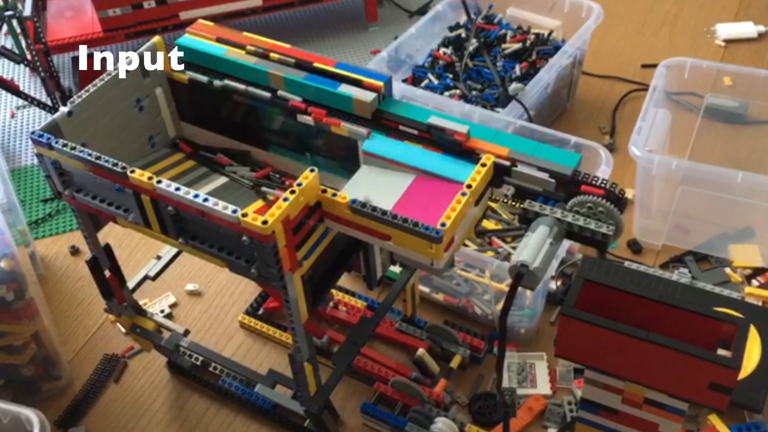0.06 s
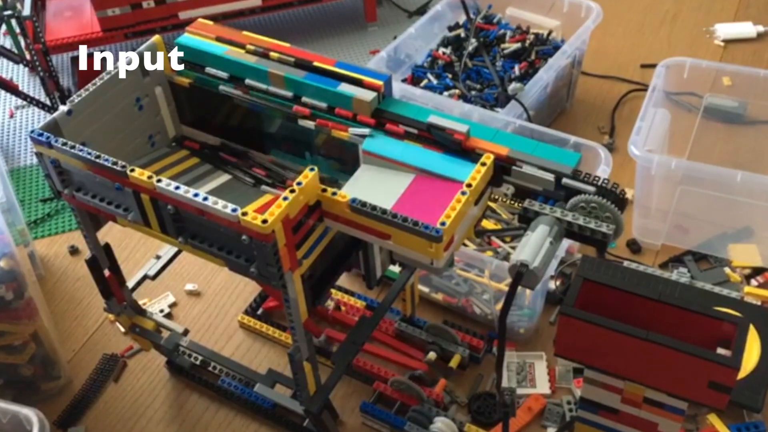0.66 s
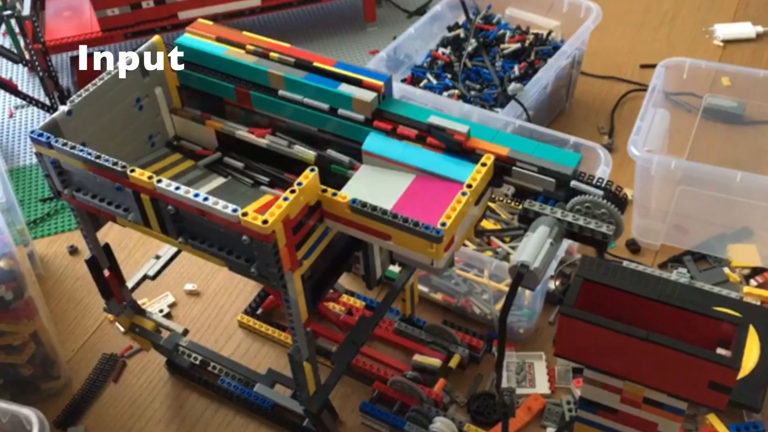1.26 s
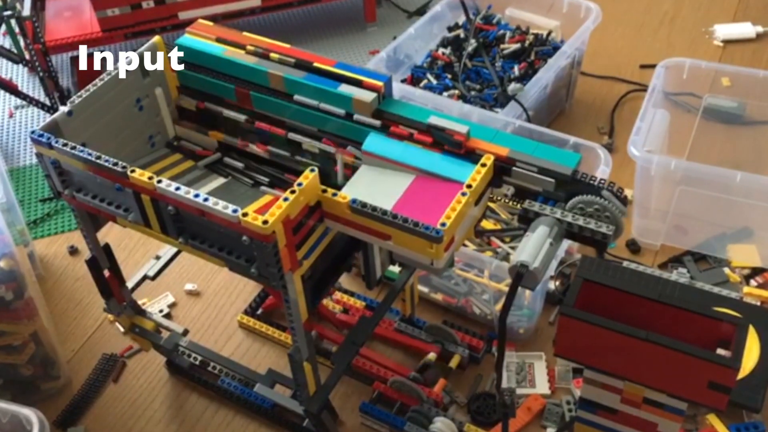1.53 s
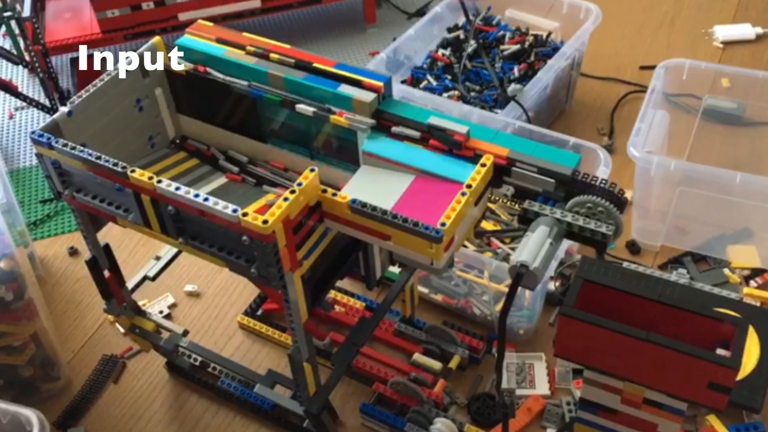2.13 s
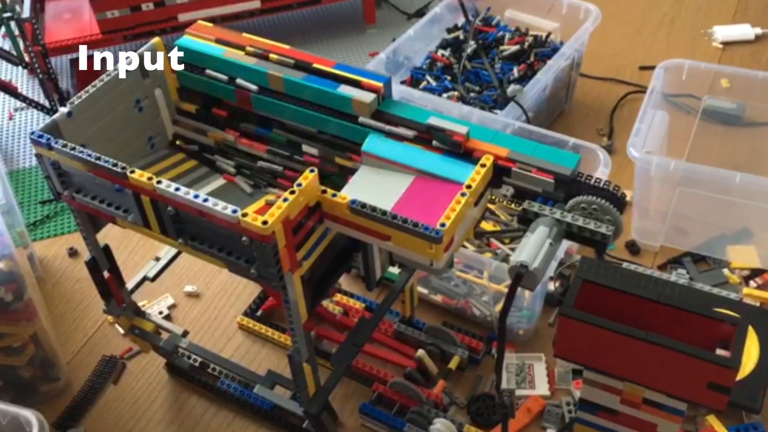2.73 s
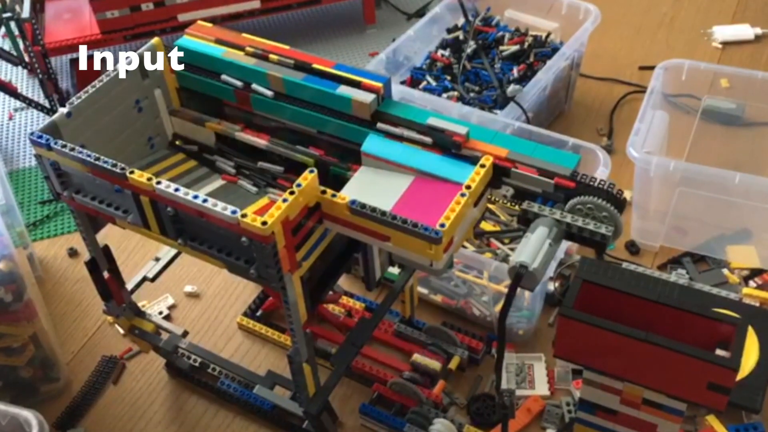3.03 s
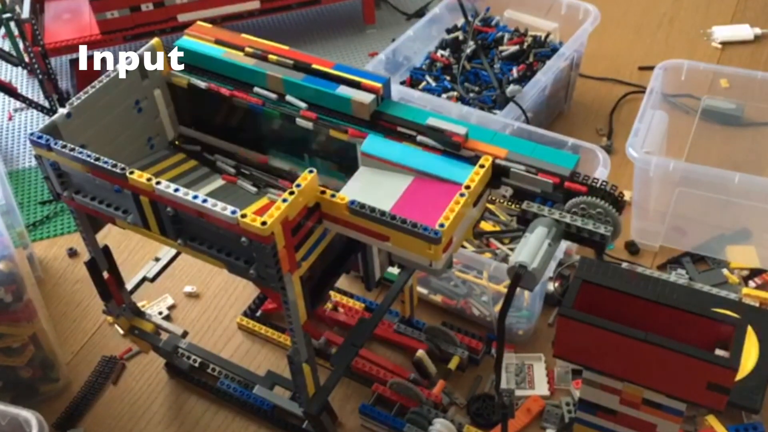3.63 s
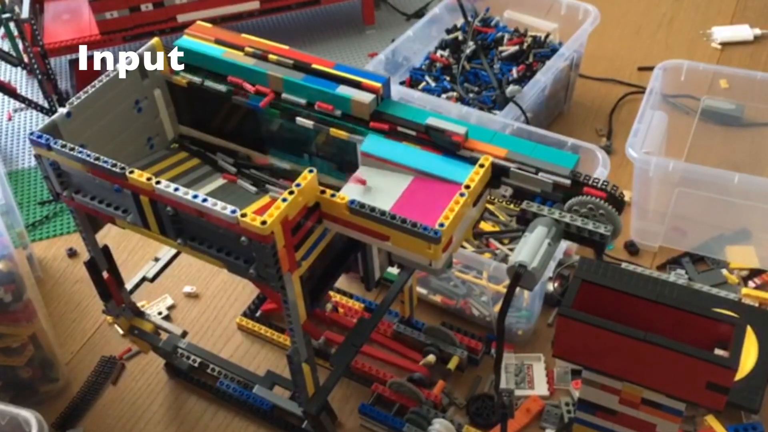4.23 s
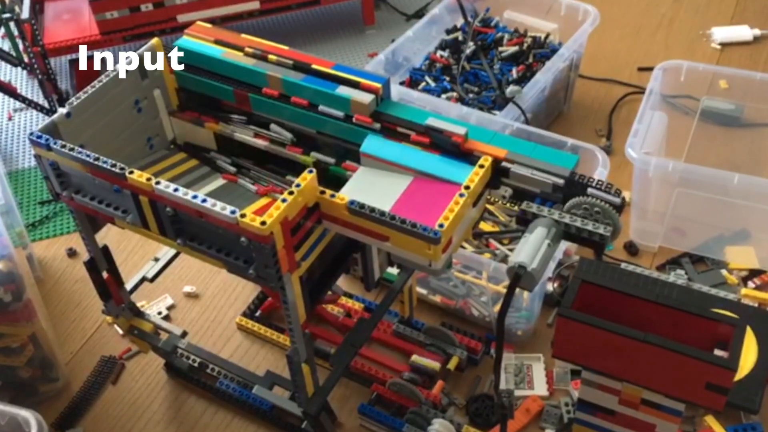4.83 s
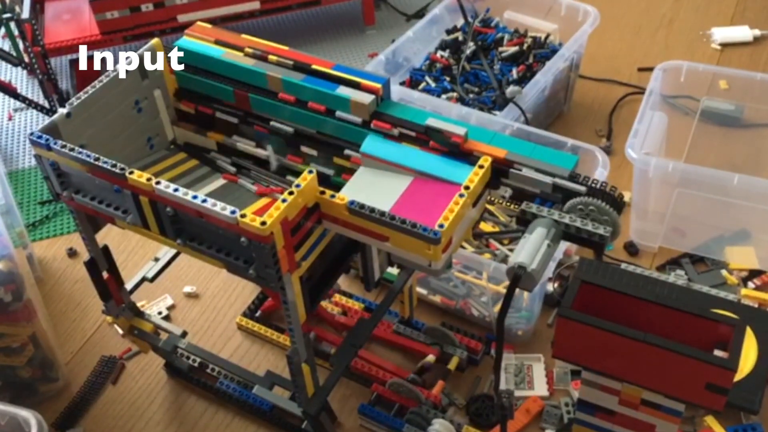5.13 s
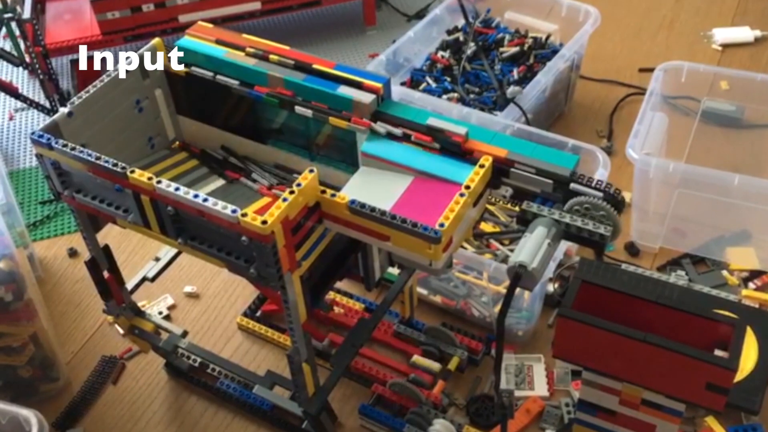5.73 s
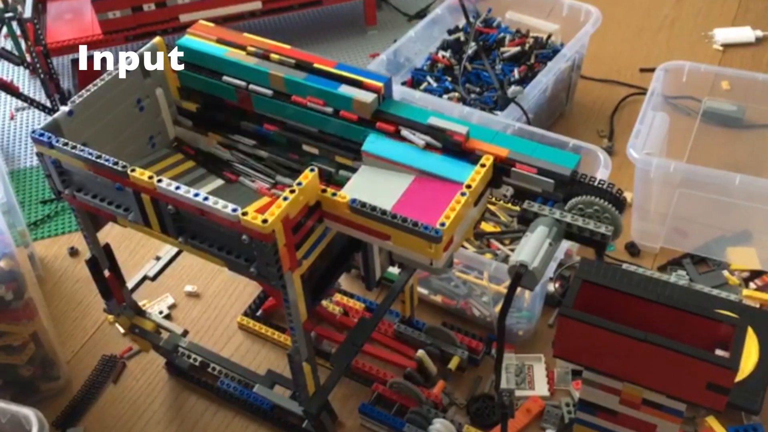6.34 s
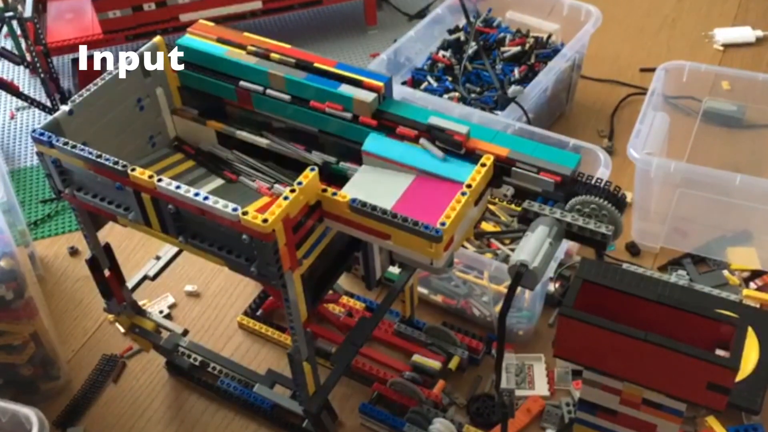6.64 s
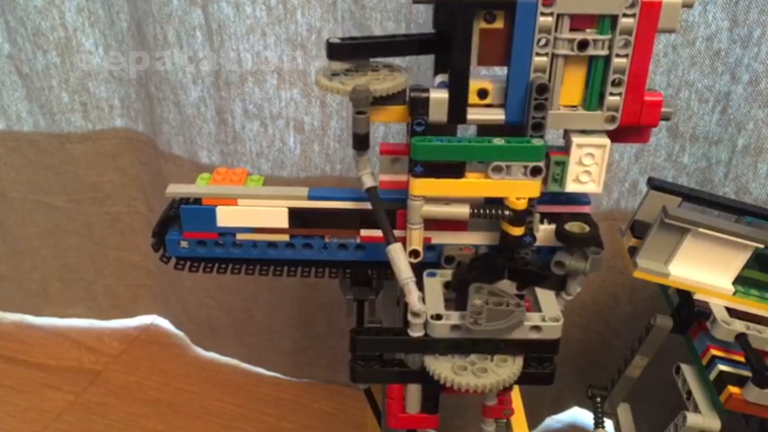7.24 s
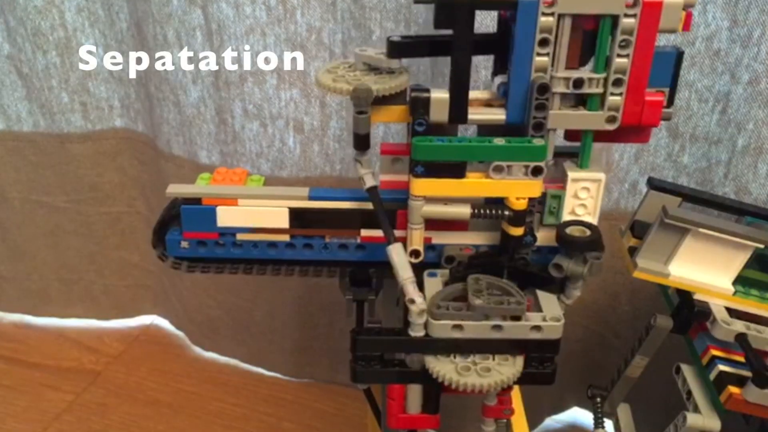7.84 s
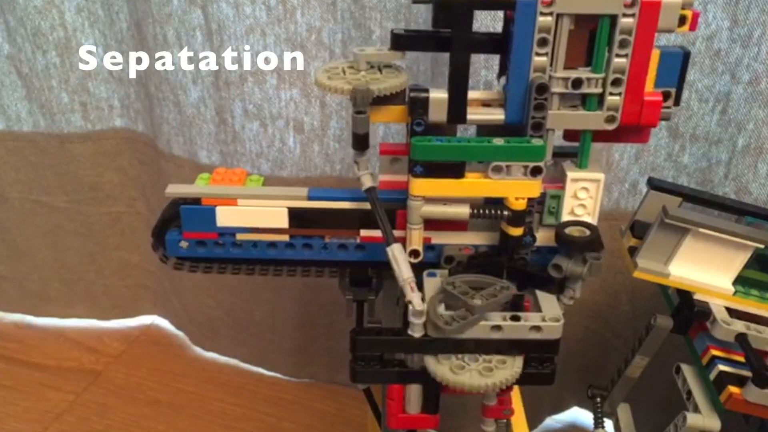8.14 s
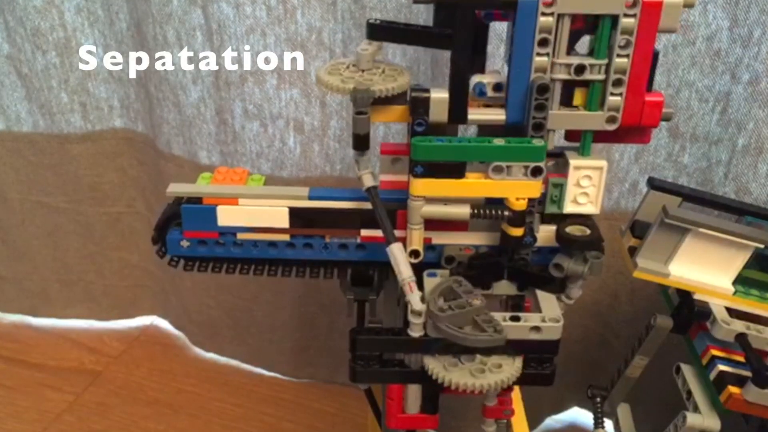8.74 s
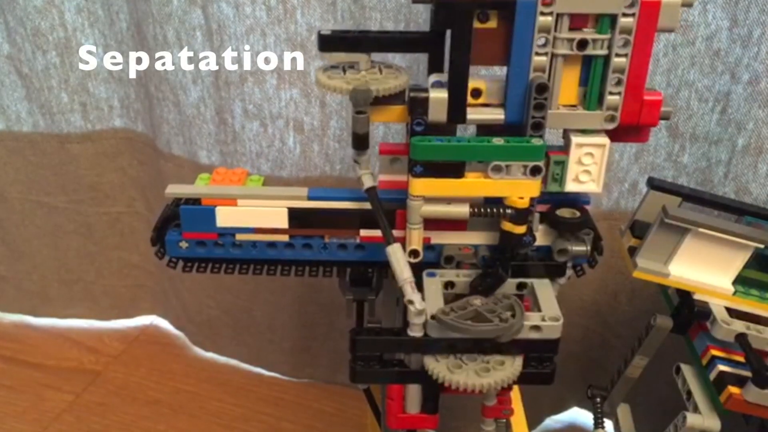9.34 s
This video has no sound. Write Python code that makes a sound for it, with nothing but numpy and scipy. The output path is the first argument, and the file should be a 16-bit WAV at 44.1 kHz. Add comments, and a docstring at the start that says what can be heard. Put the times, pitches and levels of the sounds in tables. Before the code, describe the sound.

Heard close up in a small room, loose plastic pieces rattle, click and tumble in repeated surges as a feeder lifts them. Its steps crack against a hollow frame now and then, over a faint fizz of gears. The sound then switches suddenly to the soft whir and whine of a small motor, which slows under load and speeds up again.

```python
"""Plastic brick sorting machine, close up

One microphone, close to the machine in a small room. A geared step feeder stirs a heap of loose parts:
they rattle, click and tumble, and the steps knock on the hollow frame. Then an abrupt cut to a quieter
stage, where a small geared motor whines and sags under the load of its crank."""
import sys
import numpy as np
from scipy import signal
from scipy.fft import rfft, irfft
from scipy.io import wavfile

SR = 44100
rng = np.random.default_rng(int(sys.argv[2]) if len(sys.argv) > 2 else 0)


def store_wav(level_fs):
    """Save 16-bit WAV to argv[1]."""
    pcm = np.round(np.clip(np.atleast_2d(level_fs), -1, 1) * 32767)
    wavfile.write(sys.argv[1], SR, pcm.T.astype(np.int16))


N = 422473
TIME = np.arange(N) / SR
CUT_S = 7.207  # from the feeder to the motor stage

# Levels in the tables are relative; each source adds its own gain.
# Decay of the small room: band_hz, t60_s
ROOM_DECAY = [(200, 0.32), (1300, 0.2), (3500, 0.26), (9000, 0.16), (16000, 0.11)]
# Hum of the table under the machine: frequency_hz, density_db
HUM_SPECTRUM = [(25, -14), (50, -31), (72, 8), (90, -8.5), (120, -12.5), (210, -4), (260, -9.5), (330, -4),
                (420, -9), (520, -5), (620, -24), (900, -28)]
# Fizz of the feeder's gear teeth: frequency_hz, density_db
GEAR_SPECTRUM = [(290, -43), (500, -4.5), (586, -17), (831, -6.5), (1550, -7), (1720, -42), (1980, -1),
                 (3110, 2.5), (3540, -40), (3980, -1), (6510, -3), (8330, 6), (10500, -1), (14700, 0.5),
                 (16000, -20)]
# Narrow modes of the motor housing: pitch_hz, level_db, t60_s
HOUSING_MODES = [(1813, 2.5, 0.0056), (2577, 2.5, 0.022), (3060, -4, 0.015), (3780, -1.5, 0.014),
                 (4360, -2, .018), (5310, -3, 0.016)]
# Brief squeaks in the feeder, then flares of the motor's whine: start_s, length_s, pitch_hz, level_db
SQUEAKS_AND_FLARES = [(4.258, 0.02, 4420, -36), (4.293, 0.029, 4300, -45), (5.848, .033, 4430, -45),
                      (6.045, .025, 4360, -40), (6.634, 0.075, 4430, -48.5), (6.927, .042, 4400, -39.5),
                      (7.305, 0.089, 1845, -53), (8.72, 0.11, 2090, -56.5), (8.73, 0.086, 1400, -59.5)]
# The motor sagging under its crank: time_s, mesh_hz, whine_db
MOTOR_RUN = [(7.21, 935, -54), (7.35, 910, -50.5), (7.52, 925, -54.5), (7.65, 960, -53), (7.72, 905, -52.5),
             (7.8, 768, -51.5), (7.99, 634, -54.5), (8.08, 627, -60), (8.22, 650, -57), (8.5, 603, -56.5),
             (8.65, 528, -59), (8.69, 650, -61), (8.77, 695, -59), (8.88, 675, -61), (9.02, 820, -52.5),
             (9.14, 878, -53), (9.26, 895, -49.5), (9.58, 936, -55.5)]
# Harmonics of the motor's gear mesh: multiple, level_db
MESH_HARMONICS = [(1, -8), (2, -2), (3, -3), (4, -7), (5, -3.5), (6, -9), (7, -7), (8, -22)]
# Resonances of the motor housing: frequency_hz, gain_db
HOUSING_SPECTRUM = [(250, -9), (620, -13), (900, -3), (1200, -9), (1420, 3), (1600, -0.5), (1820, 2.5),
                    (2060, -10), (2280, -2), (2560, 8), (2900, -9), (3170, 2.5), (3450, -1), (3780, -2),
                    (4150, -13), (4500, -5), (4900, -15), (8000, -17)]
# Whir of the motor's brushes: frequency_hz, density_db
WHIR_SPECTRUM = [(25, -5.5), (70, -8.5), (170, -15), (270, -11), (400, -14), (660, -16.5), (900, -13.5),
                 (1200, -14.5), (1800, -8), (2600, -3.5), (4300, -10), (6000, -7), (7500, -10.5),
                 (9200, -2.5), (10900, -0.5), (12000, -8.5)]
# The crank's linkage scraping: start_s, length_s, level_db
CRANK_SCRAPES = [(8.617, 0.03, -47), (8.845, .03, -48.5), (8.876, .035, -48)]
# Feeder strokes, about one a second: start_s, length_s, end_rattle_db, swell_db, end_tumble_db
FEEDER_STROKES = [(0.0, .22, -35, -4, -49.5), (0.576, 0.61, -39, -4, -50), (1.371, 0.53, -33.5, 11, -49),
                  (2.282, 0.43, -34, 7, -47), (3.175, 0.62, -33.5, 12.5, -51), (4.08, .41, -35.5, 6.5, -48),
                  (4.956, 0.51, -32.5, 15.5, -47.5), (5.892, 0.4, -33.5, 4.5, -45.5),
                  (6.776, 0.53, -38, 3.5, -47.5)]
# Bright rattle of light parts: frequency_hz, density_db
RATTLE_SPECTRUM = [(250, -50.5), (500, -15), (810, -13.5), (1100, -11.5), (1650, -6), (2200, -4),
                   (2900, -3.5), (3500, -5), (4900, -3.5), (6400, -7), (8100, -2), (10000, -8), (12300, -1),
                   (15500, -10)]
# Dull tumbling of heavy parts: frequency_hz, density_db
TUMBLE_SPECTRUM = [(30, -41), (80, -6), (140, -12), (190, -2.5), (240, -6), (300, -2.5), (420, -5.5),
                   (600, -10.5), (880, -1), (1100, -4), (1500, 2.5), (2300, -5), (3500, -11.5)]
# Clumps toppling into the hopper: start_s, length_s, level_db, low_cut_hz
CLUMP_TOPPLES = [(0.083, 0.047, -41.5, 900), (0.719, 0.041, -43, 1200), (0.768, 0.023, -42, 900),
                 (1.376, 0.036, -45.5, 400), (1.741, 0.042, -30.5, 150), (2.406, .06, -43.5, 395),
                 (3.182, .03, -46, 500), (3.475, 0.051, -35.5, 330), (3.568, 0.089, -41.5, 300),
                 (5.272, 0.056, -39, 400), (5.326, 0.04, -38, 250), (5.372, 0.081, -40.5, 180),
                 (6.073, 0.043, -40, 100), (7.075, 0.063, -40, 250), (7.124, 0.098, -42.5, 70)]
# Parts skidding along a step: start_s, length_s, level_db
PART_SLIDES = [(1.835, .06, -35), (1.915, 0.065, -35), (2.27, 0.041, -35), (2.903, 0.079, -41),
               (4.663, .1, -34), (5.893, 0.054, -29.5), (6.53, 0.051, -38), (7.021, 0.054, -38)]
# The loudest single parts landing: start_s, level_db, pitch_hz, frame_share_db
PART_CLICKS = [(0.0265, -10, 4260, -23), (0.11, -11.5, 2900, -14), (0.2436, -11, 3470, -15),
               (0.4752, -14, 2340, -16), (0.5147, -1, 4220, -24), (0.565, -7, 4100, -29),
               (0.613, -11.5, 4180, -24), (0.766, -22, 1470, 7), (0.841, -7.5, 8610, -20),
               (0.87, -9, 4160, -13), (0.9325, -9, 7700, -9.5), (0.9785, -8.5, 7560, -10),
               (1.2526, -10, 5100, -9), (1.5202, -16, 3160, -5.5), (1.5765, -14.5, 4600, -6),
               (1.734, -15.5, 1640, 6), (1.7509, -10, 1820, -0.5), (1.776, -12, 1570, -10),
               (2.2848, -17, 7550, -2), (2.514, -6, 12100, -10.5), (2.5712, -17, 1610, 3.5),
               (2.6344, -13.5, 7850, -5), (2.9206, -9.5, 11500, -24), (3.2578, -16, 8380, -19),
               (3.595, -13, 10300, -8), (3.7805, -9, 1680, -5), (3.8403, -9, 4190, -22),
               (4.2524, -15.5, 1590, -1), (4.3772, -11, 1750, 0.5), (5.149, -7.5, 4900, -10.5),
               (5.374, -9, 2950, -7), (5.4126, -10, 10400, -10), (5.8965, -24, 11500, -20),
               (6.0856, -10, 1670, -19), (6.1833, -11, 2730, -5), (6.733, -17.5, 3170, -19),
               (6.754, -13, 4400, -21), (6.793, -19, 4300, -20), (6.8339, -17, 3260, -18),
               (6.9053, -10.5, 11400, -18), (7.1328, -17.5, 1470, -3)]
# Modes of the hollow frame: pitch_hz, level_db, t60_s
FRAME_MODES = [(832, -12.5, 0.024), (1648, 3, 0.018), (1747, -26, 0.027), (1870, -10.5, 0.092),
               (2094, -9, 0.03), (2790, -10, 0.035), (3770, -12.5, 0.12), (4410, -3, 0.0033),
               (4830, -15, 0.017), (5175, -9.5, 0.011), (7600, -6, 0.0036), (8010, -11.5, 0.1),
               (11850, -18, 0.021)]
# Crack of a step against the frame: frequency_hz, density_db
CRACK_SPECTRUM = [(250, -59), (500, -54), (800, -8), (1150, -47), (1700, -10), (2700, 2), (3400, -4.5),
                  (4800, 10.5), (5700, 11), (6600, -2.5), (7800, 10.5), (9500, 1), (12300, 6), (15500, 2)]
# Steps snapping against the frame: start_s, level_db, frame_ring_db, second_contact_delay_s, jolt_db
STEP_KNOCKS = [(0.3925, -7, 2, 0.0029, -58), (1.1785, -6.5, 7, .005, -36), (1.667, -2.5, 2.5, 0.0093, -35),
               (3.7032, -7, -4.5, 0.0025, -35), (4.1717, -4.5, 1, 0.0054, -34),
               (4.5131, -4.5, 2, 0.0046, -46), (5.062, -5, 2, .003, -33.5), (5.7482, -4, 0, 0.0016, -40),
               (6.1117, -4, 4, 0.0061, -40)]


def gain_of(db):
    """Decibels to amplitude."""
    return 10 ** (np.asarray(db) / 20)


def unit_rms(x):
    """Scales to rms 1."""
    return x / np.sqrt(np.mean(x ** 2) + 1e-20)


def unit_energy(x):
    """Scales to energy 1."""
    return x / np.sqrt(np.sum(x ** 2) + 1e-20)


def value_at(points, hz):
    """Reads a table on a log-frequency axis."""
    table_hz, value = np.transpose(points)
    return np.interp(np.log(hz + 1), np.log(table_hz + 1), value)


def add(mix, start_s, sound):
    """Mixes a sound in at its start time."""
    part = mix[max(round(start_s * SR), 0):][:len(sound)]
    part += sound[:len(part)]


def colour(x, spectrum, size=4096):
    """Minimum-phase filter with the given spectrum; white noise keeps its level."""
    log_gain = np.log(gain_of(value_at(spectrum, abs(np.fft.fftfreq(size, 1 / SR)))))
    taps = np.fft.ifft(np.exp(np.conj(signal.hilbert(log_gain)))).real
    return signal.oaconvolve(x, unit_energy(taps[:size // 2]))[:len(x)]


def high_pass(x, hz):
    """Small things radiate little below their lowest mode."""
    return signal.sosfilt(signal.butter(2, hz, "high", fs=SR, output="sos"), x)


def wander(rate_hz):
    """Random drift of rms 1, up to about the given rate."""
    rolloff = 1 + (np.fft.rfftfreq(N, 1 / SR) / rate_hz) ** 4
    return unit_rms(irfft(rfft(rng.standard_normal(N)) / rolloff, N))


def ring(x, modes):
    """Drives damped modes that radiate no bass; each takes the energy its level gives."""
    out = np.zeros(len(x))
    for hz, db, t60_s in modes:
        angle = 2 * np.pi * min(hz, SR / 2) / SR
        radius = np.exp(-np.log(1000) / t60_s / SR)
        mode = signal.lfilter([1, 0, -1], [1, -2 * radius * np.cos(angle), radius * radius], x)
        out += gain_of(db) * unit_energy(mode)
    return out


def burst(t, fall_s):
    """A contact: a dying puff of countless short modes."""
    return unit_energy(rng.standard_normal(len(t)) * np.exp(-t / fall_s))


def impacts(samples, per_s, spread_db):
    """Random train of small blows of uneven size."""
    size = gain_of(spread_db * np.minimum(rng.exponential(1, samples), 3.5))
    return size * rng.choice([-1, 1], samples) * (rng.random(samples) < per_s / SR)


def reflections(onset_s=0.0029):
    """Dense echoes from one spot to the microphone, each band dying at its own speed."""
    taps = rng.standard_normal(SR // 2) * (rng.random(SR // 2) < .1)
    hz, t, bands = signal.stft(taps, SR, nperseg=256)
    decay = gain_of(-60 * t / value_at(ROOM_DECAY, hz)[:, None])
    tail = signal.istft(bands * decay, SR, nperseg=256)[1]
    return unit_energy(tail * np.minimum(np.arange(len(tail)) / SR / onset_s, 1) ** 2)


def room(x, spots=4):
    """Contacts happen all over the machine, and each spot has its own echoes."""
    shares = np.array([wander(24.0) for _ in range(spots)])
    shares /= np.linalg.norm(shares, axis=0)
    return sum(signal.oaconvolve(x * share, reflections())[:N] for share in shares)


def feeder_drive(gears_db=-46.5, hum_db=-63):
    """Behind the clatter, the feeder's gear teeth fizz steadily and make the table hum."""
    teeth = unit_rms(colour(impacts(N, per_s=5000, spread_db=0.5), GEAR_SPECTRUM)) * gain_of(wander(25))
    hum = colour(rng.standard_normal(N), HUM_SPECTRUM)
    return gain_of(gears_db) * teeth + gain_of(hum_db) * hum


def housing_ring(level_db=-58.0):
    """The rattle of the motor's gear train keeps the housing ringing at its own pitches."""
    return gain_of(level_db) * unit_rms(ring(rng.standard_normal(N), HOUSING_MODES))


def squeaks_and_flares():
    """Brief squeaks in the feeder, and short flares of the motor's whine ringing in its housing."""
    out = np.zeros(N)
    waver, flicker = 1 + 0.013 * wander(300), 1 + .5 * wander(90)
    for start_s, length_s, hz, db in SQUEAKS_AND_FLARES:
        fade = signal.windows.tukey(int(length_s * SR), .5)
        span = int(start_s * SR) + np.arange(len(fade))
        tone = np.sin(2 * np.pi * np.cumsum(hz * waver[span]) / SR)
        add(out, start_s, gain_of(db) * fade * flicker[span] * tone)
    return out


def scrapes():
    """The crank's linkage scrapes at its tightest point."""
    out = np.zeros(N)
    for start_s, length_s, db in CRANK_SCRAPES:
        slips = impacts(int(length_s * SR), per_s=6600, spread_db=1)
        fade = signal.windows.tukey(len(slips), .5)
        add(out, start_s, gain_of(db) * unit_rms(colour(slips, RATTLE_SPECTRUM)) * fade)
    return out


def motor(whine_trim_db=-5.5, bite_db=1.7, shaft_ratio=.305, shaft_db=-73, whir_db=-51.3, stall_db=-8):
    """Uneven gear teeth sing through the housing, over the shaft's hum and the whir of the brushes."""
    times_s, *columns = np.transpose(MOTOR_RUN)
    mesh_hz, whine_db = (np.interp(TIME, times_s, column) for column in columns)
    speed = mesh_hz / mesh_hz.max()
    flutter = 1 + 0.0124 * speed ** 2 * wander(59)  # slack teeth flutter; load steadies them
    cycles = np.cumsum(mesh_hz * flutter) / SR
    mesh = np.zeros(N)
    for multiple, db in MESH_HARMONICS:
        load_db = bite_db * multiple * (1 - speed)  # loaded teeth bite harder and sound brighter
        harmonic = np.cos(2 * np.pi * (multiple * cycles + rng.random()))
        mesh += gain_of(db + load_db) * harmonic * (1 + 0.83 * wander(120))
    whine_gain = gain_of(whine_db + whine_trim_db + 1.3 * wander(11))
    whine = whine_gain * unit_rms(colour(mesh, HOUSING_SPECTRUM))
    shaft_phase = 2 * np.pi * shaft_ratio * cycles
    shaft = gain_of(shaft_db) * speed ** 2 * np.sin(shaft_phase) * (1 + 0.27 * wander(25))
    brushes = rng.standard_normal(N) * (1 + 0.16 * np.cos(shaft_phase)) * gain_of(0.41 * wander(30))
    whir_gain = gain_of(whir_db + stall_db * (speed.mean() - speed))
    return whine + shaft + whir_gain * unit_rms(colour(brushes, WHIR_SPECTRUM))


def stir_power(start_s, length_s, end_db, swell_db, settle_db_per_s, rise_s=0.0082):
    """A step catches the heap almost at once, ramps its level while lifting, then lets it settle."""
    t = TIME - start_s
    lift_db = swell_db * (np.clip(t / length_s, 0, 1) - 1)
    settle_db = settle_db_per_s * np.maximum(t - length_s, 0)
    return (np.clip(t / rise_s, 0, 1) * gain_of(end_db + lift_db - settle_db)) ** 2


def stirring(idle_rattle_db=-50, idle_tumble_db=-66, tumble_swell=0.27, jolt_s=0.042):
    """Amplitudes of the rattle and the dull tumbling: strokes lift the heap, knocks jolt it."""
    rattle, tumble = gain_of(idle_rattle_db) ** 2, gain_of(idle_tumble_db) ** 2
    for start_s, length_s, rattle_db, swell_db, tumble_db in FEEDER_STROKES:
        rattle += stir_power(start_s, length_s, rattle_db, swell_db, settle_db_per_s=101)
        tumble += stir_power(start_s, length_s, tumble_db, tumble_swell * swell_db, settle_db_per_s=51)
    for start_s, *_, jolt_db in STEP_KNOCKS:
        rattle += stir_power(start_s, jolt_s, jolt_db, swell_db=0, settle_db_per_s=132)
    return np.sqrt(rattle), np.sqrt(tumble)


def brick(t, hz, tick_s, ring_db, t60_s):
    """One small part struck: a tick and three inharmonic modes."""
    tick = burst(t, tick_s)
    modes = [(hz, 0, t60_s),
             (hz * rng.uniform(1.7, 2.1), -4, t60_s * 1.4),
             (hz * rng.uniform(2.78, 5.0), -9, t60_s * .5)]
    return unit_energy(tick + gain_of(ring_db) * ring(tick, modes))


def heap(rattle_gain, tumble_gain, kinds=48, rattle_db=-2.07, tumble_db=-2):
    """Many kinds of loose parts jostle as the steps stir them; heavy ones tumble dully."""
    t, lumps = np.arange(SR // 25) / SR, wander(13)
    jostle = np.zeros(N)
    for hz in np.geomspace(1500, 12000, kinds):
        hits = impacts(N, per_s=22, spread_db=5.0)
        part = brick(t, hz * rng.uniform(0.91, 1.05), tick_s=0.0021, ring_db=-8, t60_s=0.039)
        jostle += signal.oaconvolve(hits, part)[:N]
    thuds = impacts(N, per_s=1500, spread_db=4.0)
    rattle = gain_of(rattle_db + 2.5 * lumps) * unit_rms(colour(jostle, RATTLE_SPECTRUM))
    tumble = gain_of(tumble_db + 1.2 * lumps) * unit_rms(colour(thuds, TUMBLE_SPECTRUM))
    return rattle_gain * rattle + tumble_gain * tumble


def topples():
    """A clump of parts slides off a step and lands in a quick, dull shower."""
    out = np.zeros(N)
    for start_s, length_s, db, low_cut_hz in CLUMP_TOPPLES:
        progress = np.linspace(0, 1, int(length_s * SR))
        shower = impacts(len(progress), per_s=5000, spread_db=6.5) * progress * (1 - progress) ** 4
        add(out, start_s, gain_of(db) * unit_rms(high_pass(colour(shower, TUMBLE_SPECTRUM), low_cut_hz)))
    return out


def slides():
    """Studs catch and let go in a quick rasp that swells and dies."""
    out = np.zeros(N)
    for start_s, length_s, db in PART_SLIDES:
        catches = impacts(int(length_s * SR), per_s=2000, spread_db=-0.5)
        rasp = colour(catches, RATTLE_SPECTRUM) * signal.windows.hann(len(catches))
        add(out, start_s, gain_of(db) * unit_rms(rasp))
    return out


def frame(blow, build_s=0.0085, spread=0.0073):
    """The hollow frame rings, a little differently at each blow; its modes take a moment to build up."""
    detunes = 1 + spread * rng.uniform(-0.68, 1, len(FRAME_MODES))
    out = np.zeros(len(blow))
    for (hz, db, t60_s), detune in zip(FRAME_MODES, detunes):
        build_up = ring(blow, [(hz * detune, 0, build_s)])
        out += ring(build_up, [(hz * detune, db, t60_s)])
    return out


def drop(db, hz, frame_db, bounce_db=-12):
    """One part lands, shakes the frame and bounces once."""
    t = np.arange(SR // 8) / SR
    strike = brick(t, hz, tick_s=0.0043, ring_db=-3, t60_s=0.0081)
    part = unit_energy(high_pass(colour(strike, RATTLE_SPECTRUM), .5 * min(hz, 4000)))
    out = part + gain_of(frame_db) * unit_energy(frame(burst(t, fall_s=0.0014)))
    add(out, rng.uniform(.005, 0.016), gain_of(bounce_db) * part)
    return gain_of(db) * out


def strays(rattle_gain, count=100, boost_db=24, spread_db=5.5):
    """Lighter parts keep dropping at random moments, harder the more the heap is stirred."""
    out = np.zeros(N)
    for slot, (when, size, pitch) in enumerate(rng.random((count, 3))):
        start_s = (slot + when) * CUT_S / count
        hz = 1600 * 7.5 ** pitch  # 1.6 to 12 kHz
        db = boost_db + spread_db * (2 * size - 1)
        add(out, start_s, rattle_gain[int(start_s * SR)] * drop(db, hz, frame_db=-9))
    return out


def clicks(boost_db=6.0, shake_db=1):
    """The loudest single parts land on the heap, close to the microphone."""
    out = np.zeros(N)
    for start_s, db, hz, frame_db in PART_CLICKS:
        add(out, start_s, drop(db + boost_db, hz, frame_db + shake_db))
    return out


def knocks(crack_db=14.0, ring_db=4.5, contact_s=0.002, second_db=-2, chatter_db=-11, chatter_s=0.024):
    """A step lands on one edge, then on the other, then chatters; all of it rings the frame."""
    out, t = np.zeros(N), np.arange(SR // 4) / SR
    for start_s, db, frame_db, delay_s, _ in STEP_KNOCKS:
        second_edge = np.pad(burst(t, contact_s), (int(delay_s * SR), 0))[:len(t)]
        landing = unit_energy(burst(t, contact_s) + gain_of(second_db) * second_edge)
        rebounds = impacts(len(t), per_s=1200, spread_db=6.5)
        chatter = unit_energy(rebounds * np.sqrt(t) * np.exp(-t / chatter_s))
        for blow, blow_db in ((landing, db), (chatter, db + chatter_db)):
            crack = gain_of(crack_db) * colour(blow, CRACK_SPECTRUM)
            ringing = gain_of(ring_db + frame_db) * frame(blow)
            add(out, start_s, gain_of(blow_db) * (crack + ringing))
    return out


def scene():
    """Close on the feeder, then on the motor stage, with the room behind both; mono."""
    steps, tones = knocks(), squeaks_and_flares()
    rattle_gain, tumble_gain = stirring()
    parts = clicks() + strays(rattle_gain) + heap(rattle_gain, tumble_gain) + slides() + topples() + tones
    gearing = motor() + scrapes() + housing_ring() + tones
    feeder = steps + gain_of(-11.5) * room(steps) + parts + gain_of(-4.5) * room(parts) + feeder_drive()
    motor_stage = gearing + gain_of(-3.5) * room(gearing)
    return np.where(TIME < CUT_S, feeder, motor_stage)[None]


def record(dry, feeder_edge_hz=15800, motor_edge_hz=11900):
    """A steep treble cut on the microphone signal, lower for the motor stage."""
    filters = (signal.firwin(401, hz, window=("kaiser", 8), fs=SR)
               for hz in (feeder_edge_hz, motor_edge_hz))
    wide, narrow = (signal.oaconvolve(dry, taps[None], "same") for taps in filters)
    return np.where(TIME < CUT_S, wide, narrow)


dry = scene()
out = record(dry)
store_wav(out)
```